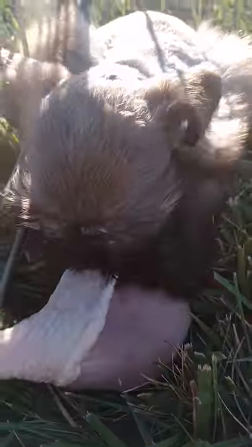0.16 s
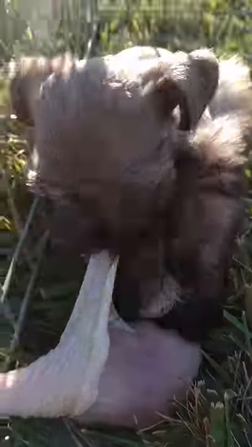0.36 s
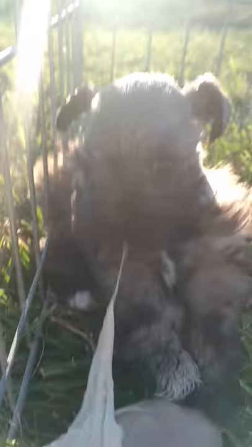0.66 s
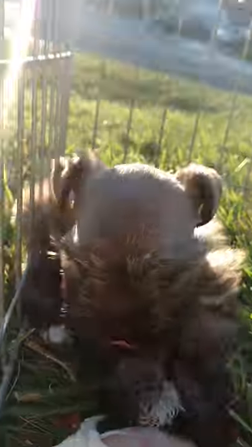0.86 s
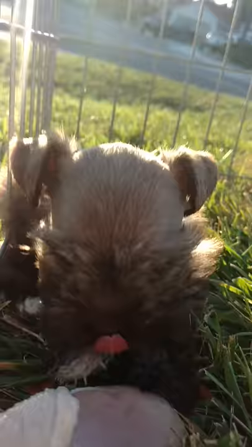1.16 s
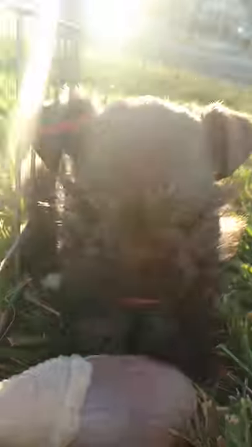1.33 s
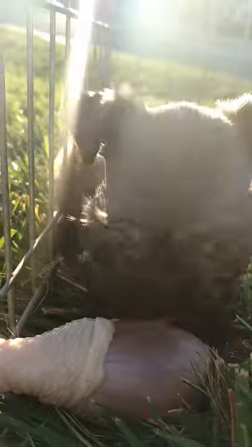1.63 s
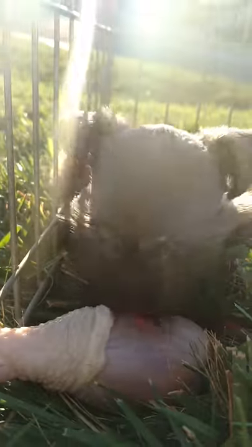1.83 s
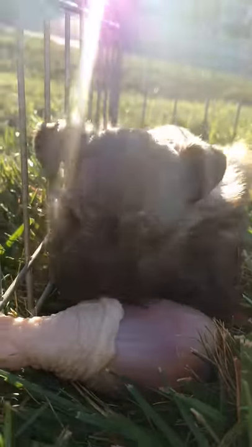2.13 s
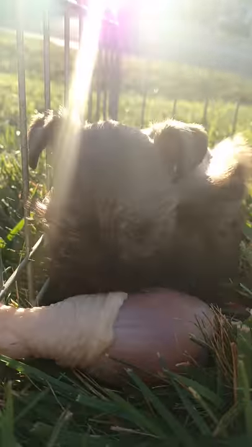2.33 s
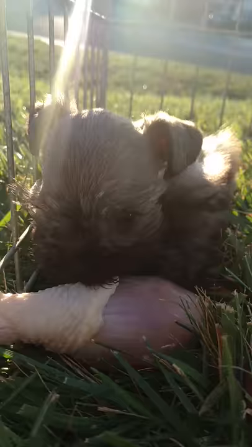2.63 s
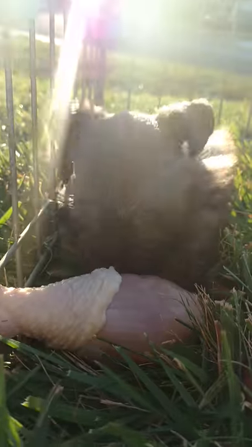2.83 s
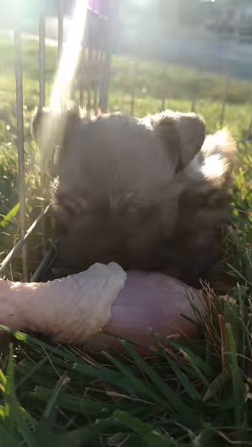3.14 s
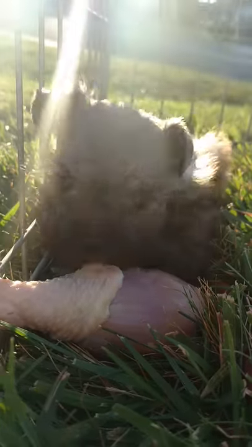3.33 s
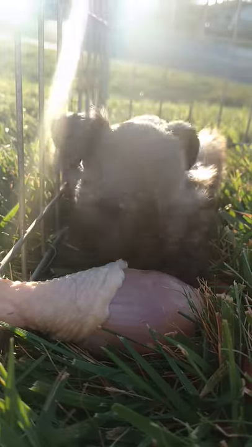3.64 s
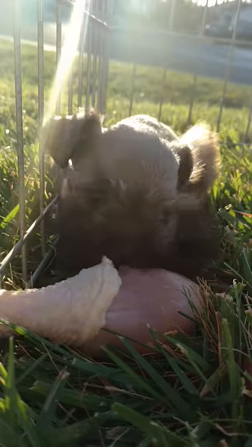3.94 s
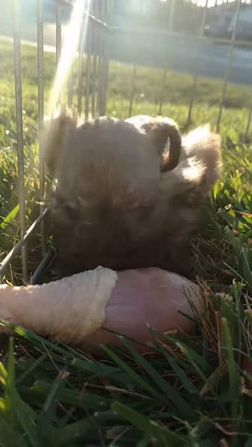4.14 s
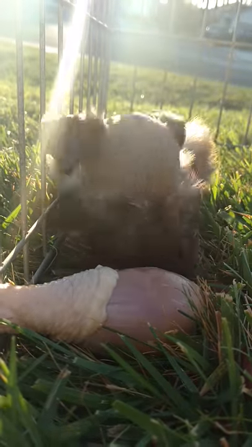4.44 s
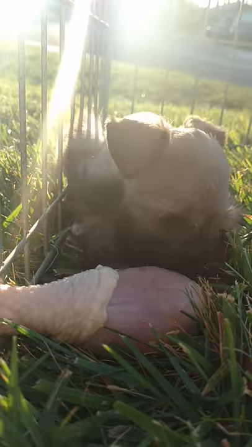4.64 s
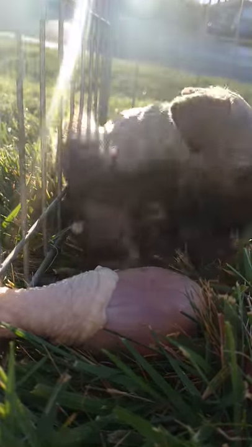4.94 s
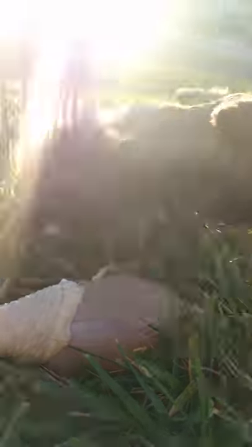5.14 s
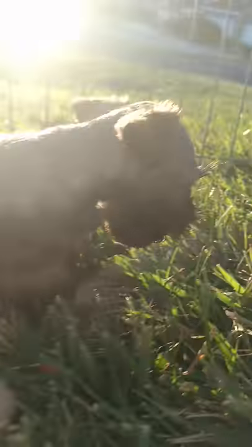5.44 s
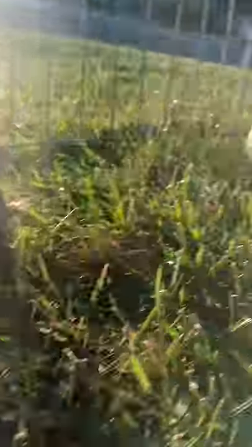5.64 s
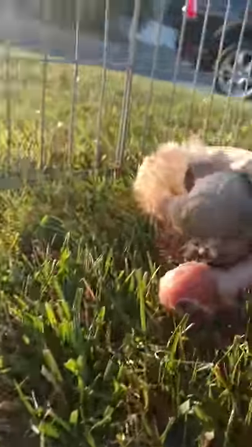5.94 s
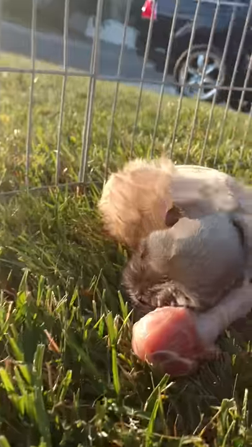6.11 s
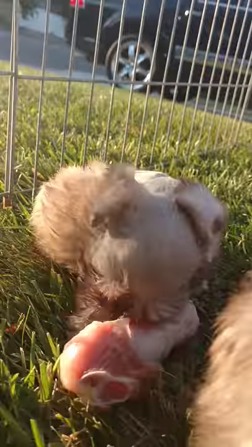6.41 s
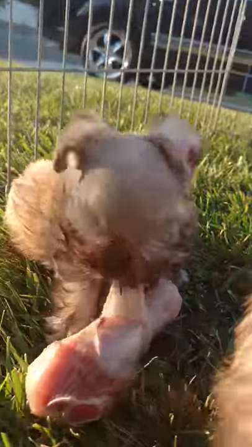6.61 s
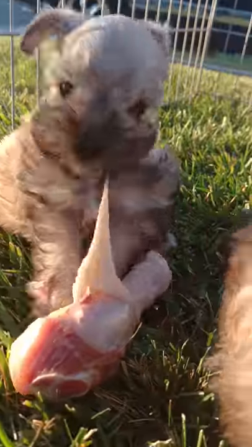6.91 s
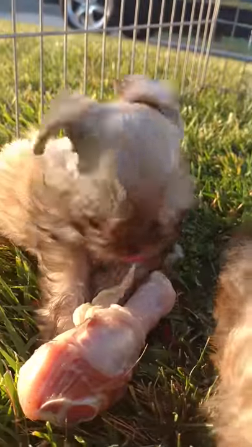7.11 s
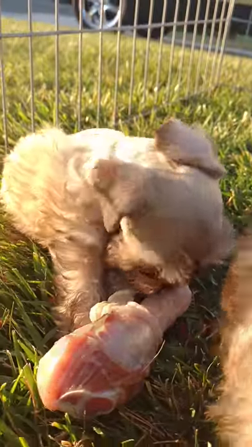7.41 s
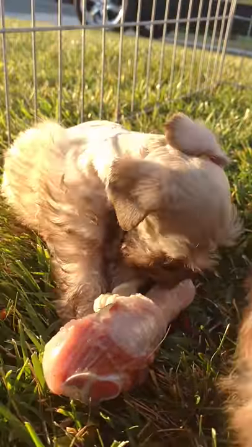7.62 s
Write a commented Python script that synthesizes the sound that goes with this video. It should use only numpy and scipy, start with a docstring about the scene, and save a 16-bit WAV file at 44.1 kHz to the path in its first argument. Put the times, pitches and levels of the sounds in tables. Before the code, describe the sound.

Close outdoor chewing: early loud slapping snaps, busy crisp crackles and moist clicks, grass and fur rubbing the microphone, a faint brief whine late.

```python
"""A lawn near a street: puppies tug and chew raw chicken legs, a phone lies low in the grass beside them.
Two skin snaps are delayed damped modes plus flutter; mouth smacks are sagging rings with a noisy edge.
Crackles are noise bursts; grass and fur brush the phone as clumped clicks and hiss over a dull drag.
A faint two-partial whine, gusty wind and street hum (shaped noise) lie behind.
Stereo: each of the phone's two ports minus a delayed share of the other."""
import sys
import numpy as np
from scipy import signal
from scipy.fft import rfft, irfft, next_fast_len
from scipy.io import wavfile

SR = 44100
rng = np.random.default_rng(int(sys.argv[2]) if len(sys.argv) > 2 else 0)


def store_pcm(level_fs):
    """Save levels as 16-bit WAV."""
    pcm = np.round(np.clip(level_fs, -1, 1) * 32767).astype(np.int16)
    wavfile.write(sys.argv[1], SR, np.atleast_2d(pcm).T)


N = 342657

# Skin snaps: t/s, level/dB (before mode level), upper-lower port/dB, lower port delay/samples
SNAPS = [(.6846, -5, 3, 0.0), (.8687, -6, -4, -8.0)]
# Loose skin fluttering on the meat, one row per snap: end after snap/s, drive level/dB
FLUTTER = [(0.036, -44), (0.015, -58)]
# Modes of skin slapping meat: f/Hz, level/dB (re snap), t60/s, upper-lower port/dB (added to the snap's)
SLAP_MODES = [(356, -9, 0.014, -21.5), (634, -6.5, 0.0067, 9), (1460, -9, 0.012, -2),
              (2575, -1, 0.0014, 22.5), (4060, -7.5, 0.0034, -2), (5820, -17.5, 0.0047, -21),
              (9100, -14, 0.0021, -14.5)]
# Wet smacks and bumps: t/s, nominal level at quieter port/dB, settled f/Hz, upper-lower port/dB
SMACKS = [(0.5915, -45, 199, 14), (0.744, -37, 393, 13), (0.754, -40.5, 450, 18.5), (0.7637, -43, 377, 13),
          (0.7754, -45.5, 366, 22), (0.7977, -43.5, 474, 19.5), (0.886, -35, 423, -12.5),
          (0.925, -41, 267, -15.5), (0.946, -42, 507, -11), (0.983, -46, 396, 14), (1.0847, -39, 336, -12),
          (1.586, -41.5, 910, -17), (1.6482, -36.5, 345, -13.5), (2.0814, -42.5, 447, -17.5),
          (2.1048, -42, 370, -16), (2.129, -42.5, 473, -15.5), (2.1703, -33, 560, -4),
          (2.2751, -41.5, 795, -14), (2.5556, -41, 313, -12), (2.641, -40.5, 604, -7.5),
          (2.7079, -43.5, 527, -12.5), (2.9471, -37.5, 306, 19), (3.0172, -42, 513, -13),
          (3.1105, -42, 403, -11), (3.2284, -39.5, 584, -11), (3.2942, -34, 1370, 14.5),
          (3.3093, -37, 690, -5), (3.393, -36.5, 303, 22.5), (3.584, -32.5, 560, -6),
          (3.8011, -34.5, 617, -6), (3.917, -36.5, 630, -13.5), (3.9839, -34.5, 775, -2),
          (4.197, -29.5, 109, 1), (4.198, -39, 900, -4), (4.917, -42, 209, 17), (4.9214, -34.5, 815, -6),
          (4.956, -36.5, 414, -9.5), (4.995, -36.5, 253, 10.5), (5.0749, -44, 610, -15),
          (5.0893, -40.5, 634, -16), (5.158, -41, 620, 11.5), (5.187, -35, 650, -6),
          (6.6935, -39.5, 1770, 11.5), (6.7077, -41, 1410, 7), (6.856, -37.5, 110, 12),
          (7.101, -29.5, 650, 1), (7.212, -38.5, 706, 3), (7.288, -36, 1860, -4.5)]
# Single crackles: t/s, peak at quieter port/dB, centre f/Hz, nominal rise/ms, upper-lower port/dB
CRACKLES = [(0.113, -38.5, 3300, 0.56, -0.5), (0.2305, -35, 4200, 0.27, 2.5), (0.2887, -37, 8000, 0.33, -2),
            (0.3163, -40, 8000, 0.34, -4.5), (0.3795, -46, 3500, 0.42, -9.5),
            (0.555, -23.5, 4770, 0.37, 2.5), (0.7405, -34, 4670, 0.35, 8.5),
            (0.804, -30.5, 4160, 0.18, -1.5), (0.808, -36, 4500, 0.3, -3.5), (0.8172, -35, 5820, 0.69, 9),
            (0.8449, -25, 5200, 0.74, 9), (0.8857, -36, 4500, 0.55, 7), (1.256, -36, 8020, 0.26, -1),
            (1.3631, -20.5, 7600, 0.59, -2), (1.458, -41, 9000, 0.15, -4),
            (1.5116, -23.5, 6900, 0.32, -5.5), (1.585, -40, 7000, 0.4, -7), (1.646, -28, 6450, 0.67, -7),
            (1.8378, -37, 9250, 0.69, -12), (1.924, -38, 7600, 0.15, -11.5),
            (1.955, -40, 7300, 0.25, -16.5), (2.027, -29, 6550, 0.23, -1.5),
            (2.0463, -42, 11400, 0.25, -13), (2.08, -35, 9400, 0.72, -10.5), (2.161, -32, 8000, 0.4, -4),
            (2.273, -27, 4420, 0.44, 2.5), (2.389, -37, 9000, 0.3, -6), (2.4518, -37.5, 8500, 0.48, -20),
            (2.541, -19, 10800, 0.36, -1.5), (2.5784, -27, 8990, 0.22, -6),
            (2.5823, -30, 9100, 0.44, -10.5), (2.62, -38, 9000, 0.71, -4), (2.667, -33, 5200, 1.6, -2),
            (2.7048, -32, 5630, 1, -1), (2.727, -34, 13400, 0.66, -9.5), (2.752, -23.5, 3980, 0.16, 2),
            (2.76, -34, 8000, 0.3, -5.5), (2.826, -41, 7960, 0.62, -11), (2.851, -38, 11000, 0.48, -5),
            (2.874, -43, 11000, 0.36, -9), (2.907, -33.5, 8180, 0.74, -6.5),
            (2.9517, -36.5, 7660, 0.22, -13), (2.99, -33.5, 8450, 1.2, -7), (3.0221, -24.5, 7560, 0.23, 2),
            (3.099, -29.5, 11100, 1.1, -13), (3.112, -39, 7470, 0.27, -18),
            (3.145, -26.5, 7900, 0.12, -3.5), (3.2005, -25, 5710, 0.27, -2), (3.2136, -25, 8700, 0.3, -2),
            (3.2248, -20.5, 5230, 0.37, -2.5), (3.291, -21.5, 7800, 2.3, -1.5),
            (3.351, -34, 5440, 0.19, -11), (3.4102, -27.5, 9600, 1.9, 1), (3.4178, -34, 6860, 1.3, -7),
            (3.494, -30, 5360, 0.56, 1), (3.512, -31.5, 7900, 0.27, 0), (3.582, -26.5, 6550, 0.29, -3.5),
            (3.6412, -30, 7400, 0.27, 1.5), (3.6555, -32, 4740, 0.79, 2.5), (3.743, -35, 6000, 0.3, -1.5),
            (3.766, -36.5, 3500, 0.43, 0.5), (3.801, -25.5, 2470, 0.43, 3.5), (3.8057, -32, 7200, 0.48, 2),
            (3.879, -35.5, 8000, 0.47, -7), (3.9116, -26.5, 3960, 1.9, 2), (3.9573, -29, 7620, 0.4, 2),
            (3.9851, -32, 3500, 0.42, 7.5), (4.198, -38, 5800, 0.8, -2.5), (4.221, -33, 6330, 0.5, -8),
            (4.2404, -31, 5140, 0.88, -1.5), (4.2505, -28, 6500, 1.1, -2), (4.255, -28.5, 8500, 0.65, -2),
            (4.36, -34.5, 5940, 0.42, -1.5), (4.4674, -41, 6490, 0.55, -5.5), (4.6047, -34, 5700, 0.15, -9),
            (4.6253, -39, 8000, 0.34, -5), (4.7119, -35, 4020, 1.1, -1), (4.83, -37, 6860, 0.45, -7.5),
            (4.8813, -38, 7050, 0.26, -10), (4.8889, -33.5, 7550, 0.22, -10.5),
            (4.9126, -36, 10500, 0.3, -7), (4.956, -37.5, 8400, 0.25, -1), (5.004, -35, 8040, 0.8, -7.5),
            (5.0764, -26, 7630, 0.1, -2), (5.159, -34, 6500, 2.6, -5), (5.232, -32, 7960, 1.2, -7.5),
            (5.282, -34.5, 7760, 1.3, -13), (5.286, -30, 7590, 2.1, -2.5), (5.31, -48, 11500, 2, -18),
            (5.3262, -29.5, 10700, 0.95, -7), (5.33, -38.5, 10900, 4, -12), (5.949, -29, 2900, 0.27, 1),
            (6.088, -37, 8000, 0.72, -2), (6.168, -30.5, 5800, 0.14, 6.5), (6.327, -32, 3140, 0.46, -1.5),
            (6.4307, -27, 5400, 0.29, 0), (6.5439, -35, 5000, 0.33, -0.5), (6.694, -40, 6300, 0.3, -2),
            (6.711, -37, 6300, 0.5, -3), (6.857, -31, 4800, 0.44, 5), (6.872, -30, 1980, 0.76, 1.5),
            (6.9829, -34.5, 3900, 0.43, 9.5), (7.2037, -34, 2900, 0.33, 0.5),
            (7.5999, -33, 5060, 0.25, 8.5), (7.6374, -30, 7260, 0.21, 2.5), (7.659, -34, 3470, 0.2, 2)]
# Strokes of grass and fur along the phone: full at t/s, hold/s, crackle level/dB, dull drag level/dB
STROKES = [(0.694, 0.02, -46, -33.5), (0.752, 0.0081, -59, -37.5), (0.88, 0.014, -55, -29),
           (0.92, 0.039, -60, -39.5), (1.062, 0.024, -61, -40.5), (1.148, 0.049, -72, -40),
           (1.26, 0.015, -49.5, -40.5), (1.547, 0.2, -50, -48.5), (1.92, 0.047, -50, -48),
           (2.074, 0.057, -50, -40.5), (2.142, 0.042, -43.5, -43.5), (2.243, 0.019, -41, -47),
           (2.329, 0.091, -46.5, -46.5), (2.446, 0.11, -40, -45), (3.045, 0.014, -46.5, -45.5),
           (3.075, 0.079, -44, -42), (3.205, 0.01, -42.5, -50), (3.295, 0.004, -40.5, -33.5),
           (3.339, 0.043, -42, -42), (3.587, 0.0024, -44, -45), (3.803, 0.036, -52.5, -46),
           (3.905, 0.17, -57, -54), (4.05, 0.0081, -56, -65), (4.225, 0.025, -59, -42),
           (4.258, 0.0077, -52, -60), (4.602, 0.03, -50, -48), (4.709, 0.0044, -61, -44.5),
           (4.865, 0.076, -45.5, -44), (4.949, 0.22, -42, -40), (5.188, 0.069, -39, -41),
           (5.27, 0.04, -46.5, -66), (5.4, 0.051, -51, -67), (5.53, 0.074, -49.5, -62),
           (5.64, 0.046, -50, -67), (6.16, 0.016, -57, -52), (6.8, 0.07, -49, -64), (7.723, 0.06, -45, -72)]
# Grass and fur resting on the phone, faint rustle: t/s, crackle level/dB, dull drag level/dB
RESTING = [(0.0, -72, -58), (0.32, -52, -54), (0.6, -70, -56.5), (0.86, -72, -76), (1.05, -61, -46.5),
           (1.4, -52, -55.5), (2.0, -51, -46.5), (2.3, -47.5, -47), (2.72, -54, -54.5), (3.04, -49, -46.5),
           (3.2, -75, -54), (3.28, -75, -57), (3.43, -55, -50.5), (4.2, -81, -52), (4.8, -82, -53.5),
           (5.35, -61, -56), (6.45, -54.5, -57), (7.15, -61, -53), (7.45, -52, -55.5), (7.62, -70, -54),
           (7.77, -72, -72)]
# Crackle spectrum, relative: f/Hz, level/dB
CRACKLE_SPECTRUM = [(800, 13), (1800, 8.4), (3000, 7.8), (5000, 8.9), (8000, 11.5), (12000, 4.1),
                    (16000, 4.6)]
# Dull drag spectrum, relative: f/Hz, level/dB
DRAG_SPECTRUM = [(120, -38), (220, 5.5), (400, 3), (700, -3.5), (1200, -11.5), (2000, -13.5), (3000, -90)]
# Faint whine further off: t/s, mean f/Hz, first partial/dB, second partial/dB (before port gains)
WHINE = [(5.87, 660, -75, -85), (5.92, 628, -55, -68), (5.98, 620, -57, -62), (6.03, 580, -56, -59),
         (6.11, 566, -56, -60), (6.16, 584, -61, -61), (6.22, 562, -53, -63), (6.29, 606, -51, -69),
         (6.37, 594, -54, -72), (6.43, 625, -70, -85)]
# Surroundings: t/s, wind level/dB, street hum level/dB (both before the offsets in air())
AIR = [(0.0, -48, -53), (0.52, -52, -54.5), (0.58, -32, -53), (0.71, -41, -53), (0.95, -55, -62.5),
       (1.7, -47, -60.5), (2.99, -60.5, -60.5), (3.24, -45, -56.5), (4.3, -51, -54.5), (4.93, -36, -51.5),
       (5.08, -46, -51.5), (5.56, -42, -51), (5.86, -56, -55), (6.01, -37, -54), (6.12, -50, -55),
       (6.19, -31.5, -56), (6.32, -46, -53.5), (7.77, -50.5, -54.5)]
# Wind spectrum, relative: f/Hz, level/dB
WIND_SPECTRUM = [(22, -13), (40, -22), (70, -11.5), (120, -4), (200, -22), (350, -26.5), (700, -42)]
# Street hum spectrum, relative: f/Hz, level/dB
HUM_SPECTRUM = [(100, 30.5), (200, 28.5), (350, 22.5), (600, 11.5), (1000, 5.5), (1800, 6), (3000, 7.5),
                (5000, 8), (8000, 3), (12000, -3.5), (16000, -4)]
# Port pair: f/Hz, share of other port subtracted [ratio], lower port gain/dB, right side phase lag/rad
PAIRING = [(30, .85, 0, 0), (100, .68, 0, 0), (500, .75, 0, 0), (1200, .88, 0, 0), (2300, .94, 0, 0),
           (3400, .78, 1, .1), (4600, .45, 2, .4), (8000, .33, 3, 1.1), (10500, .28, 3, 1.6),
           (11400, .26, 8, 1.8), (12300, .25, 3, 2.0), (16000, .2, 5, 2.8)]

STROKE_RISE_S, STROKE_FADE_DB_PER_S = 0.013, 529
SMACK_RISE_CYCLES = 0.3   # of the smack's own period
PORT_TRAVEL_HZ = 2300   # 1 / sound travel time between ports
CUTOFF_HZ = 16800   # stopband edge


def snaps():
    """Skin lets go and slaps back: modes start 0.8 period late, highs first; light touches re-excite them."""
    out, t = np.zeros((2, N)), np.arange(3000) / SR
    for s, level_db, upper_db, lower_late, length_s, flutter_db in np.hstack([SNAPS, FLUTTER]):
        block_gain = rng.exponential(1, len(t) // 100).repeat(100) ** .5
        uneven = rng.standard_normal(len(t)) * block_gain
        fade_in = np.clip(t / 0.0023, 0, 1)
        fade_out = np.clip((length_s - t) / .003, 0, 1)
        touches = signal.lfilter(*signal.butter(1, 2200, fs=SR), uneven) * fade_in * fade_out
        for k, (hz, mode_db, t60_s, mode_upper_db) in enumerate(SLAP_MODES):
            since = np.maximum(t - .8 / hz, 0)
            decay = from_db(level_db + mode_db - 60 * since / t60_s)
            ring = (-1) ** k * decay * np.sin(2 * np.pi * hz * since)   # alternating polarity
            flutter = signal.fftconvolve(touches, ring)[:len(t)]
            ring = ring + from_db(flutter_db - level_db) * flutter
            add(out, ring, s, upper_db + mode_upper_db, lower_late)
    return out


def smacks():
    """A wet pocket opens: damped ring sagging in pitch, rough bright edge at onset."""
    out, t = np.zeros((2, N)), np.arange(2500) / SR
    noises = rng.standard_normal((len(SMACKS), len(t)))
    for (s, level_db, hz, upper_db), noise in zip(SMACKS, noises):
        rise_ms = 1000 * SMACK_RISE_CYCLES / hz
        turns = hz * (t + 0.00017 * (1 - np.exp(-t / 0.00022)))
        ring = np.sin(2 * np.pi * turns) * swell(t, rise_ms)
        band = signal.butter(2, [hz, 4.16 * hz], "band", fs=SR)
        edge = signal.lfilter(*band, noise) * swell(t, 0.7 * rise_ms)
        sound = ring + 0.38 * edge / abs(edge).max()
        add(out, from_db(level_db + abs(upper_db) / 2) * sound, s, upper_db, 0.23 * upper_db)
    return out


def crackles():
    """Tiny noise bursts, each coloured around its centre; the nearer port hears it first."""
    out, t = np.zeros((2, N)), np.arange(1200) / SR
    noises = rng.standard_normal((len(CRACKLES), len(t)))
    for (s, level_db, hz, rise_ms, upper_db), noise in zip(CRACKLES, noises):
        burst = noise * swell(t, 1.39 * rise_ms) ** 2
        band = signal.butter(1, [hz / 1.25, min(hz * 1.12, .45 * SR)], "band", fs=SR)
        sound = signal.lfilter(*band, burst) + 0.24 * burst
        sound = sound / abs(sound).max()
        add(out, from_db(level_db + abs(upper_db) / 2) * sound, s, upper_db, 1.8 * upper_db)
    return out


def brushing():
    """Blades flick past in clumps: clicks over rubbing hiss and dull drag, louder at the lower port."""
    crackle_gain, drag_gain = stroke_levels()
    swing = np.tanh(0.24 * drift(70) + .5 * drift(450))   # bounded
    clumps = from_db(4.3 * swing)
    out = np.zeros((2, N))
    for port, port_db in enumerate((-8, 0)):
        clicks = tinted(grains(1400 * clumps, spread_db=3.7), plain=.8)
        flicks = clicks + .6 * rng.standard_normal(N)
        crackle = coloured(flicks * clumps, CRACKLE_SPECTRUM)
        crackle = shifting(crackle, swing_db=2.5, rate_hz=18.3)
        drag = coloured(grains(1200.0, spread_db=3.0) * np.sqrt(clumps), DRAG_SPECTRUM)
        out[port] = from_db(port_db) * (crackle_gain * crackle + drag_gain * drag)
    return out


def stroke_levels():
    """Gains of crackle and drag: resting rustle plus strokes (rise, hold, dB-linear fade), summed as power."""
    t, power = np.arange(N) / SR, from_db(in_time(RESTING)) ** 2
    for full_s, held_s, *levels_db in STROKES:
        since = t - full_s
        rise = np.clip(1 + since / STROKE_RISE_S, 0, 1)
        shape = rise * from_db(-STROKE_FADE_DB_PER_S * np.clip(since - held_s, 0, .2))
        near = slice(int((full_s - .05) * SR), int((full_s + held_s + .2) * SR))
        power[:, near] += (from_db(levels_db)[:, None] * shape[near]) ** 2
    return np.sqrt(power)


def tinted(clicks, plain):
    """Colours each click: dealt to one of eight broad resonances, over a plain share; rms 1."""
    dealt, out = rng.integers(0, 8, N), plain * clicks
    for k, hz in enumerate(np.geomspace(2600, 14500, 8)):
        band = signal.butter(1, [hz / 1.2, hz * 1.2], "band", fs=SR)
        own_clicks = clicks * (dealt == k) + 1e-18
        out += signal.lfilter(*band, own_clicks) * np.sqrt(SR / hz)
    return rms_one(out)


def shifting(x, swing_db, rate_hz):
    """Low, middle and high bands swell and sink independently, as other blades take over."""
    low = signal.lfilter(*signal.butter(2, 4500, fs=SR), x)
    high = signal.lfilter(*signal.butter(2, 9500, "high", fs=SR), x)
    bands = (low, x - low - high, high)
    gains = from_db([swing_db * drift(rate_hz) for _ in bands])
    return sum(band * gain for band, gain in zip(bands, gains))


def whine():
    """Two harmonic partials from an unsteady throat; the lower port's level wavers."""
    hz, first_db, second_db = in_time(WHINE)
    hz = hz * (1 + .011 * drift(25))
    t, phase = np.arange(N) / SR, 2 * np.pi * np.cumsum(hz) / SR
    partials = from_db(first_db) * np.sin(phase) + from_db(second_db) * np.sin(2 * phase)
    voice = partials * (t > WHINE[0][0]) * (t < WHINE[-1][0])
    return np.array([from_db(-8) * voice, voice * from_db(2.5 * drift(30) - 2)])


def air():
    """Gusty wind, its noise unrelated at the ports; street hum whose long waves reach both alike."""
    wind_db, hum_db = in_time(AIR)
    gusts_db = np.array([2.0 * drift(58), 2.0 * drift(54)]) + 2.8 * drift(7.1)
    wind = coloured(rng.standard_normal((2, N)) * from_db(gusts_db), WIND_SPECTRUM)
    own, wave = rng.standard_normal((2, N)), rng.standard_normal(N)
    common = np.array([wave, np.roll(wave, 7)])   # lower port 7 samples late
    lowpass = signal.butter(2, 800, fs=SR)
    arriving = own + signal.lfilter(*lowpass, 2.42 * common - 0.85 * own)
    hum = coloured(arriving, HUM_SPECTRUM) * from_db(1.6 * drift(15))
    # hum is louder at the ports than after the subtraction
    return from_db(wind_db - 3.0) * wind + from_db(hum_db + 10.0) * hum


def add(ports, sound, s, upper_db, lower_late):
    """Adds a short sound to both ports, splitting level difference and delay (samples) evenly."""
    for port, sign in ((0, 1), (1, -1)):
        gain = from_db(sign * upper_db / 2)
        start = max(round(s * SR - sign * lower_late / 2), 0)
        ports[port, start:start + len(sound)] += gain * sound[:N - start]


def swell(t, rise_ms):
    """Rises to 1 in the rise time (at least 0.1 ms), then dies away."""
    x = 1000 * t / max(rise_ms, .1)
    return x * np.exp(1 - x)


def grains(per_s, spread_db):
    """Random clicks of uneven size and either sign."""
    size_db = spread_db * np.minimum(rng.exponential(1, N), 4)
    sizes = from_db(size_db) * rng.choice([-1, 1], N)
    return sizes * (rng.random(N) < per_s / SR)


def drift(rate_hz):
    """Slow chance: noise through a double-pole lowpass at rate_hz; rms 1."""
    r = np.exp(-2 * np.pi * rate_hz / SR)
    settled = signal.lfilter([1], [1, -2 * r, r * r], rng.standard_normal(N + SR))[SR:]
    return rms_one(settled)


def coloured(x, spectrum):
    """Shapes x by an (f/Hz, level/dB) spectrum, 10 dB/octave down past its ends; rms 1."""
    hz, level_db = np.transpose(spectrum)
    size = next_fast_len(N)
    octave = np.log2(np.arange(size // 2 + 1) * SR / size + 1)
    below = np.maximum(np.log2(hz[0]) - octave, 0)
    above = np.maximum(octave - np.log2(hz[-1]), 0)
    gain = from_db(np.interp(octave, np.log2(hz), level_db) - 10 * (below + above))
    return rms_one(irfft(rfft(x, size) * gain, size)[..., :N])


def in_time(rows):
    """Interpolates each column of a curve table to every sample."""
    s, *columns = np.transpose(rows)
    return [np.interp(np.arange(N) / SR, s, c) for c in columns]


def rms_one(x):
    """Scales to rms 1."""
    return x / np.sqrt(np.mean(x ** 2) + 1e-20)


def from_db(db):
    """Amplitude gain of a dB value."""
    return 10 ** (np.asarray(db) / 20)


def scene():
    """Sum of all sources at the upper and lower port."""
    return snaps() + smacks() + crackles() + brushing() + whine() + air()


def record(dry):
    """Each side is one port minus a delayed share of the other; peaks clip, the top is cut."""
    size = next_fast_len(N + 1000)
    hz = np.arange(size // 2 + 1) * SR / size
    at_hz, *columns = np.transpose(PAIRING)
    share, lower_db, lag_rad = [np.interp(np.log(hz + 1), np.log(at_hz), c) for c in columns]
    upper, lower = rfft(dry, size) * [np.ones_like(hz), from_db(lower_db)]
    cross = share * np.exp(-2j * np.pi * hz / PORT_TRAVEL_HZ)
    left = upper - cross * lower
    right = (lower - cross * upper) * np.exp(-1j * lag_rad)
    sides = irfft([left, right], size)[:, :N]
    lowpass = signal.cheby2(12, 60, CUTOFF_HZ, fs=SR, output="sos")
    return signal.sosfilt(lowpass, np.clip(sides, -.9, .9))


dry = scene()
out = record(dry)
store_pcm(out)
```